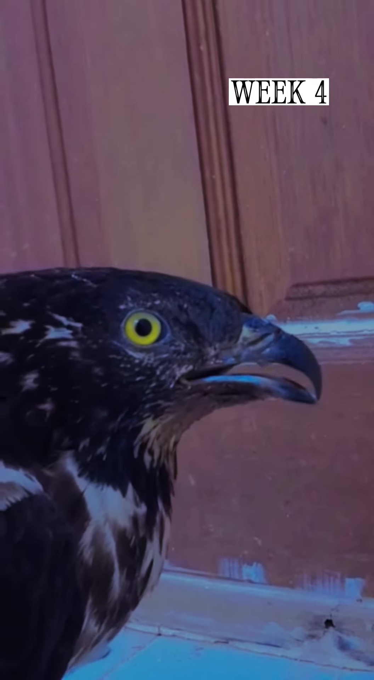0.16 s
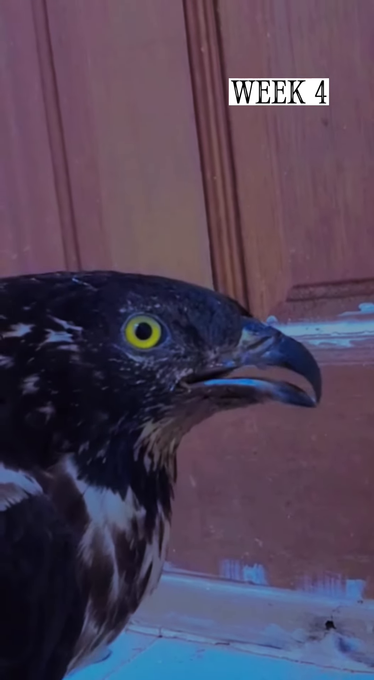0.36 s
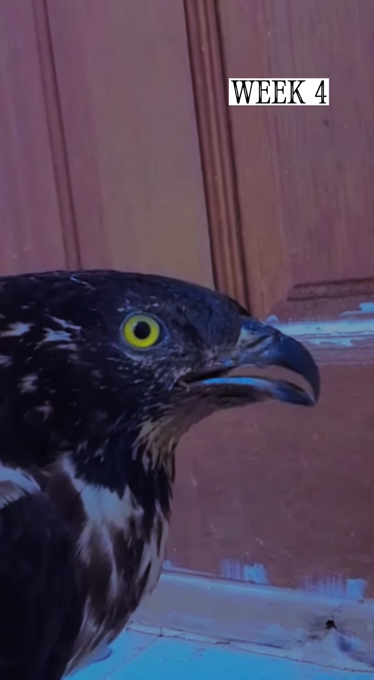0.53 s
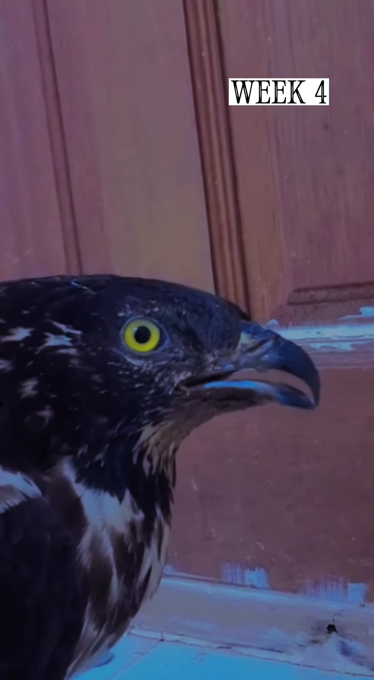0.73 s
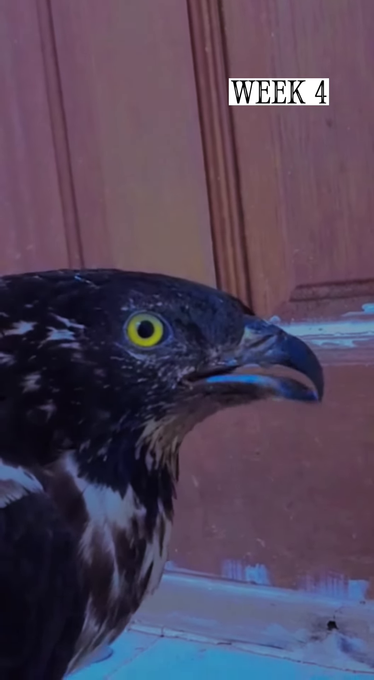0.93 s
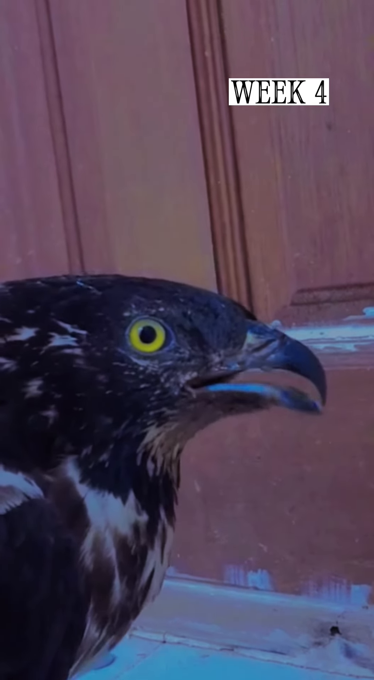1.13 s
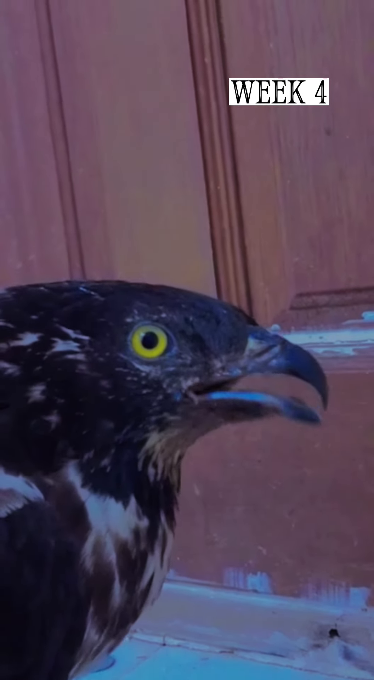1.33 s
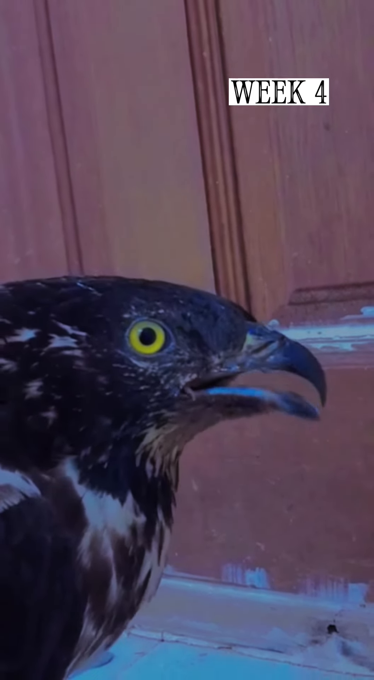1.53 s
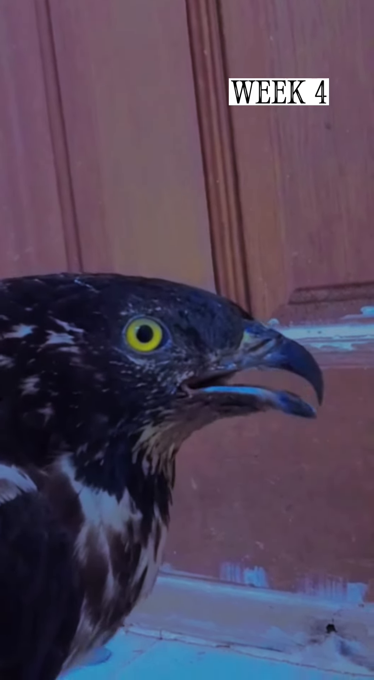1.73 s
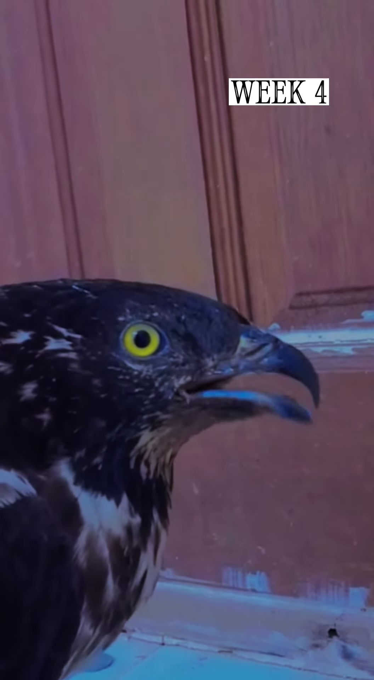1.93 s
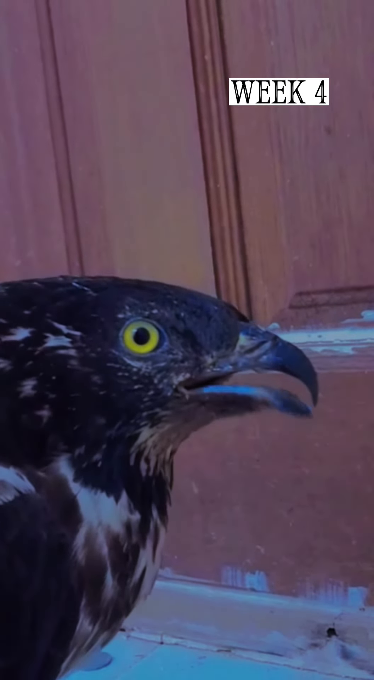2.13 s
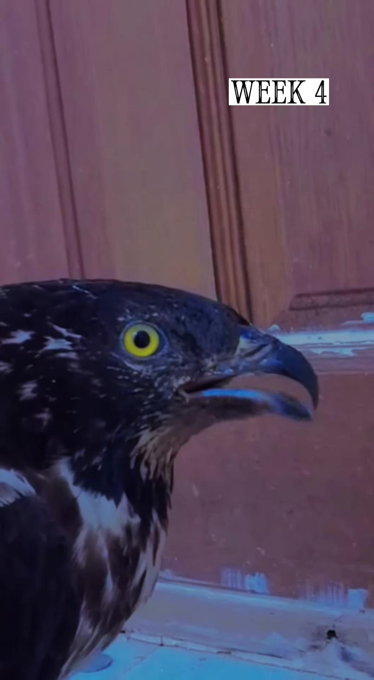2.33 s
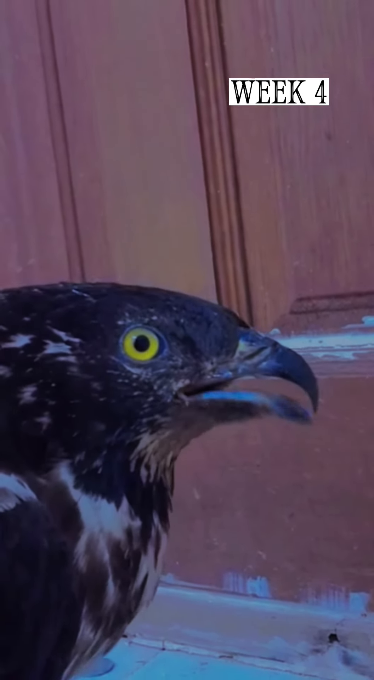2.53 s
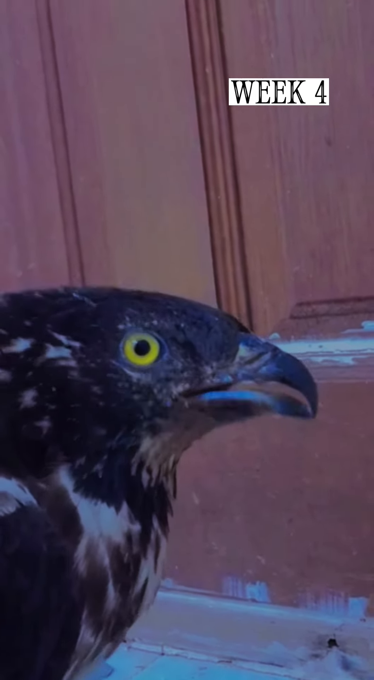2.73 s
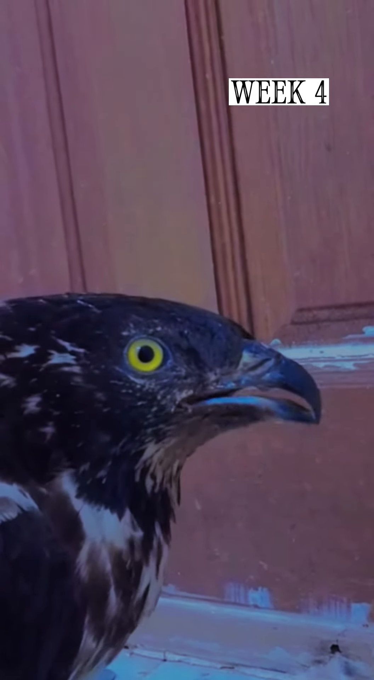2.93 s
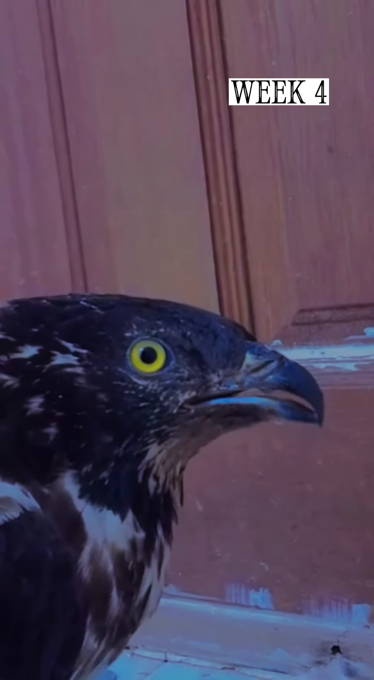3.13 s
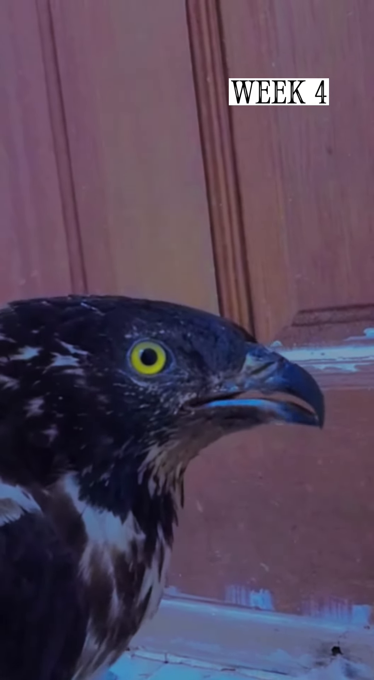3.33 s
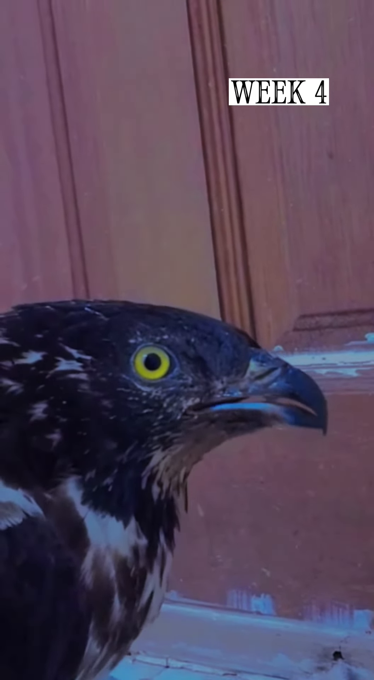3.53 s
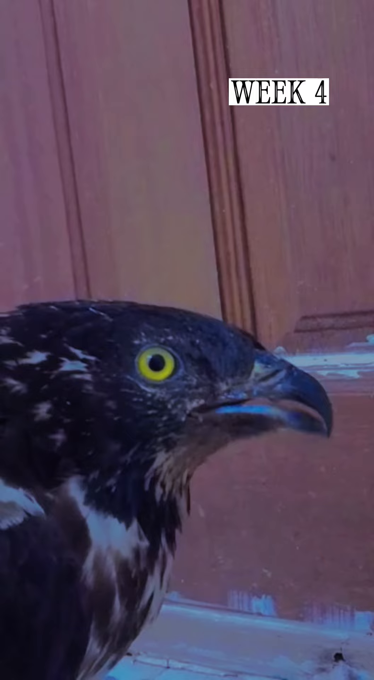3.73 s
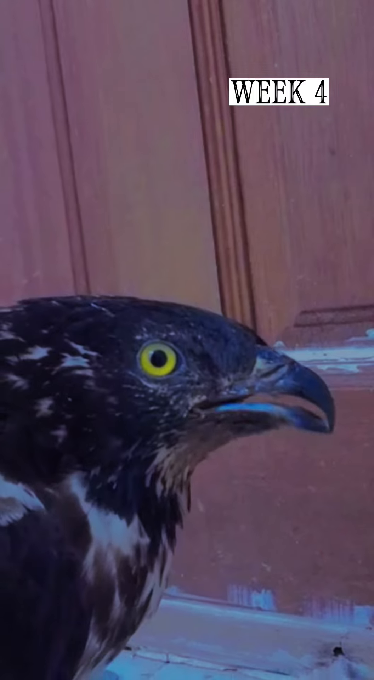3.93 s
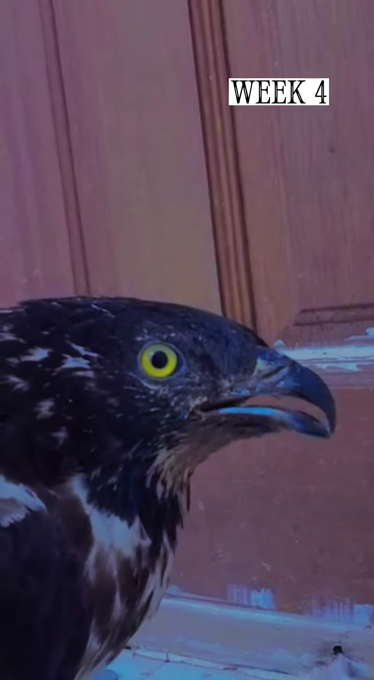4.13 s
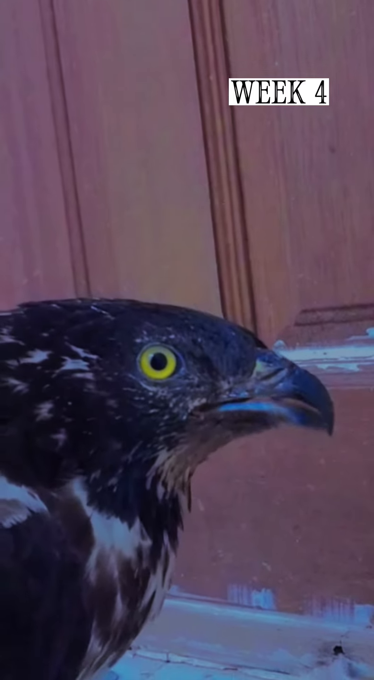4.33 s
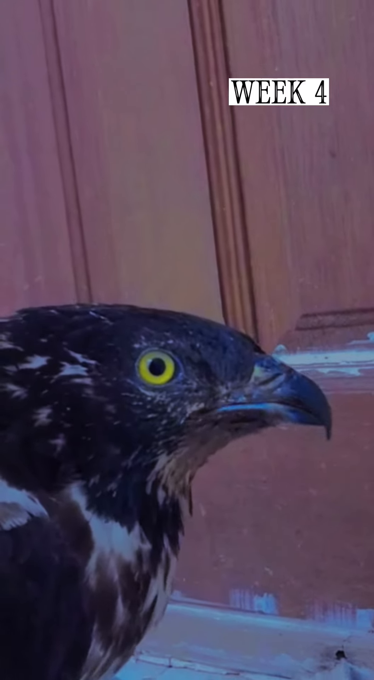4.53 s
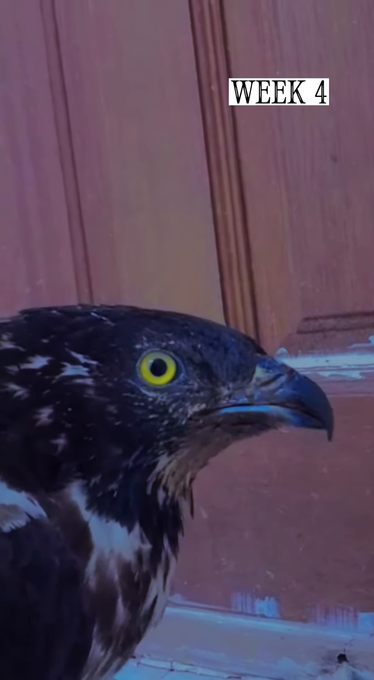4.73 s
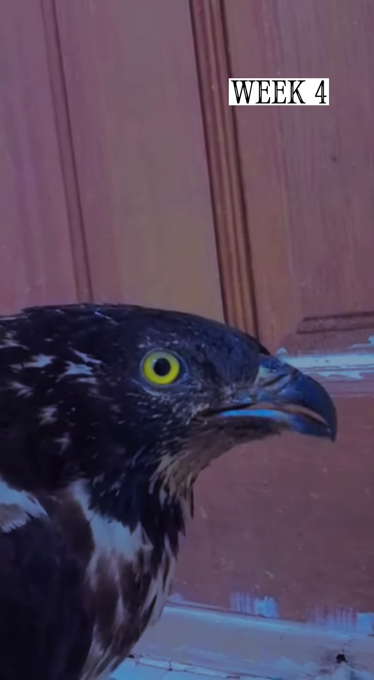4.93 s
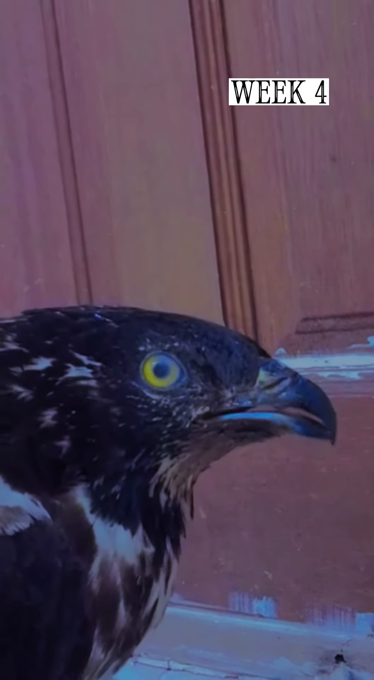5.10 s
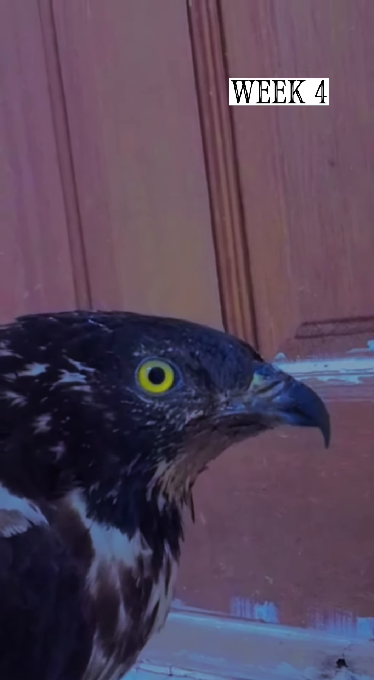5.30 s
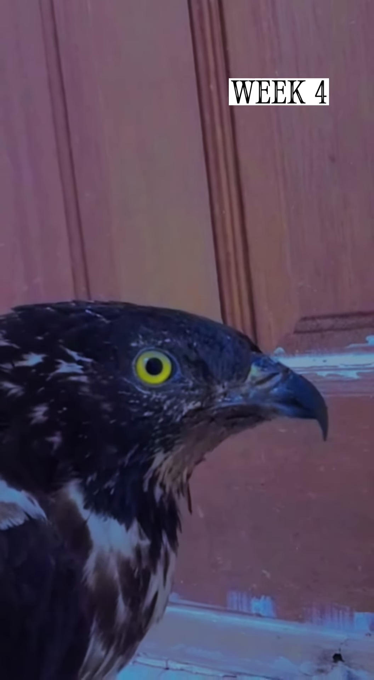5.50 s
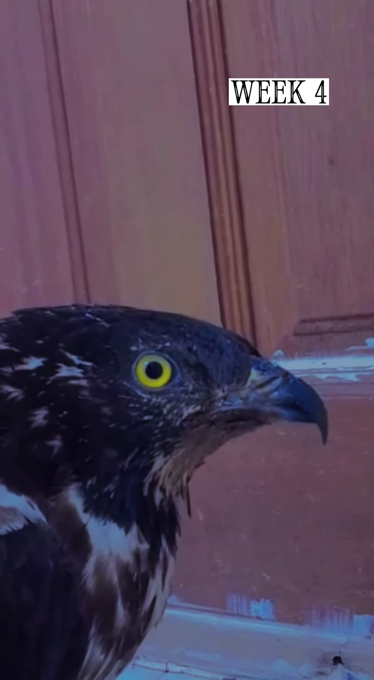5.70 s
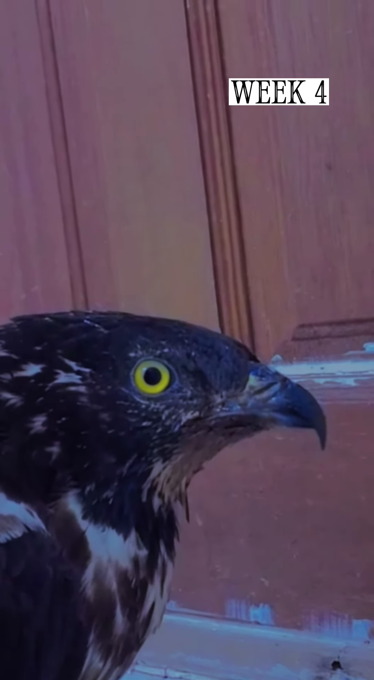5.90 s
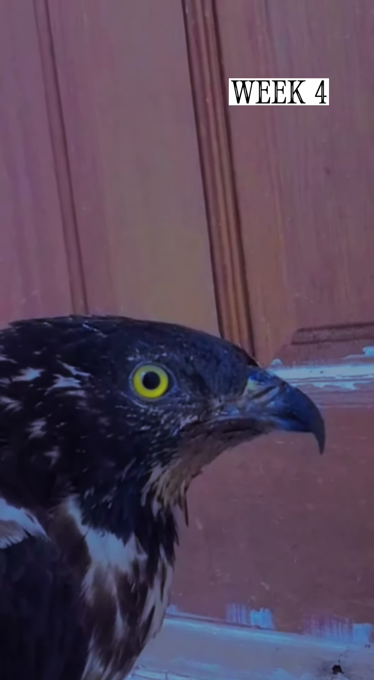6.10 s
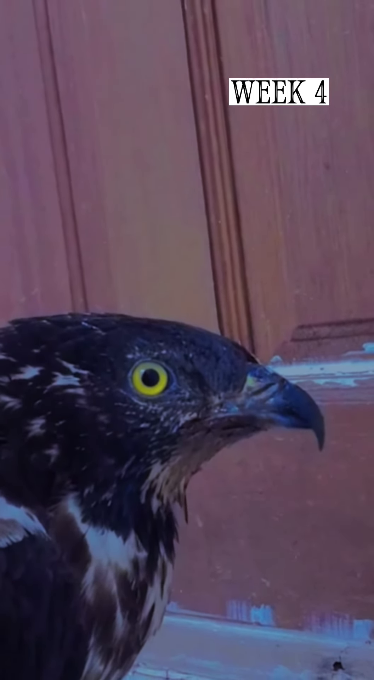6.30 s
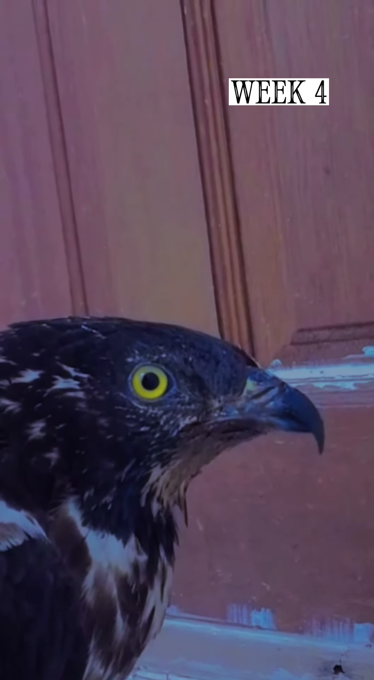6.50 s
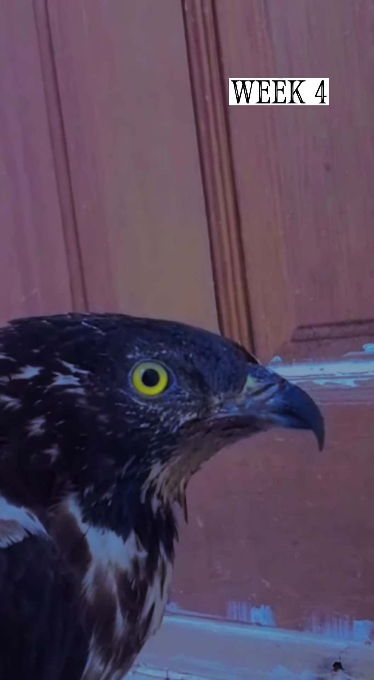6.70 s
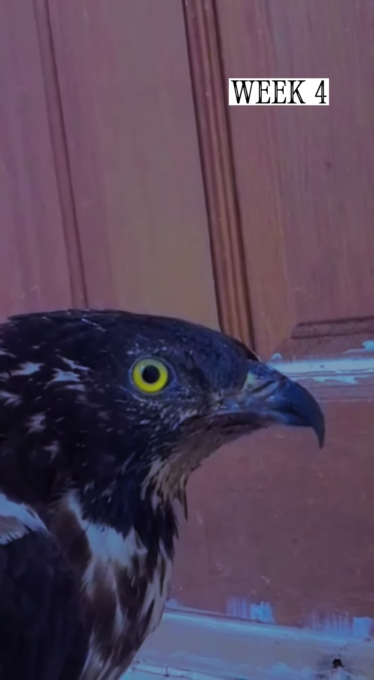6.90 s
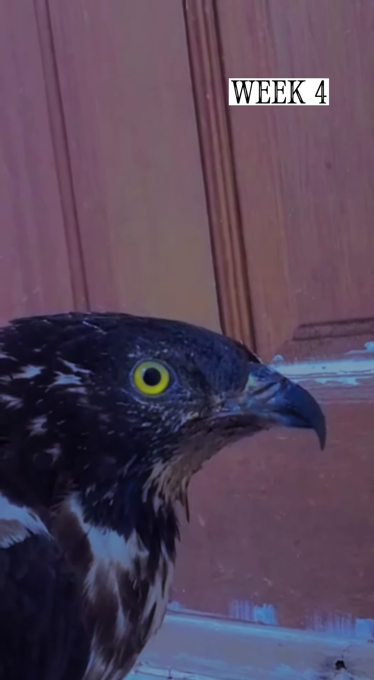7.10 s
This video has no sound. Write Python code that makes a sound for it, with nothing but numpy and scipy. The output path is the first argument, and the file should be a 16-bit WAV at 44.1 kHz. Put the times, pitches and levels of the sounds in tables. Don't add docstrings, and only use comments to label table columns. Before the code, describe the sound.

Already under way at the start, a shrill quavering raptor call pulses quickly, each loud hoarse peep led by a quieter whistle on the inhale. It is strongest early and midway, then lower and more tired, ending just after five seconds with a short wooden room ring. Underneath, wind buffets the right side of the close microphone with dull thuds, clicks and bassy rumble over faint hiss.

```python
import sys
import numpy as np
from scipy import signal
from scipy.fft import rfft, irfft, next_fast_len
from scipy.io import wavfile
from scipy.ndimage import uniform_filter1d

SR = 44100
rng = np.random.default_rng(int(sys.argv[2]) if len(sys.argv) > 2 else 0)


def ratio_of_db(decibels):
    return 10 ** (np.asarray(decibels, float) / 20)


def unload_wav(signal):
    wavfile.write(
        sys.argv[1],
        SR,
        np.round(np.clip(np.atleast_2d(signal).T, -1, 1) * 32767).astype(np.int16),
    )


N = 315315


def colour(x, hz, db, lag=0):
    size = next_fast_len(N + 4096)
    log_f = np.log(np.maximum(np.arange(size // 2 + 1) * SR / size, 1))
    gain = ratio_of_db(np.interp(log_f, np.log(hz), db))
    turn = np.exp(-1j * np.interp(log_f, np.log(hz), lag + 0 * hz))
    return irfft(rfft(x, size) * gain * turn, size)[..., :N]


def unit(x):
    return x / np.sqrt(np.mean(x ** 2))


def walk(count):
    knots = rng.standard_normal(int(count * N / SR) + 2)
    return 1.125 * np.interp(np.arange(N) * count / SR, np.arange(len(knots)), knots)


def add(track, s, sound):
    i = int(s * SR)
    track[i:i + len(sound)] += sound[:N - i]


# time in seconds, level in dB.
DRAUGHT = [(0, -37.5), (.5, -41), (1.0, -39.5), (1.6, -39), (1.91, -44), (2.2, -39), (3.1, -38.5),
           (3.7, -38), (4.4, -43), (4.68, -36), (5.04, -44.5), (5.32, -35.5), (5.71, -45), (6.3, -36.5),
           (6.85, -36), (7.15, -44)]
STIR_DB, STIR_S = 2.5, 0.07


def draught_db(t):
    stir = sum(np.exp(-np.abs(t - s - .02) / STIR_S) * ratio_of_db(db - 0.5) for s, db, *_ in PUSHES + PULLS)
    return np.interp(t, *np.transpose(DRAUGHT)) + STIR_DB * np.tanh(stir)


# frequency in Hz, density in dB per Hz.
RUMBLE = [(15, -71), (25, -23.5), (55, -3.5), (90, 0), (120, -9), (160, -13.5), (250, -27.5), (400, -37),
          (700, -55), (1200, -69.5), (2600, -110)]
# frequency in Hz, density in dB per Hz.
LEFT_RUMBLE = [(25, -35), (50, -9), (90, 0.5), (150, -11), (300, -23.5), (600, -40), (1200, -50),
               (3000, -69)]
# frequency in Hz, density in dB per Hz.
HISS = [(590, -36), (1000, -6.5), (2290, -11), (3340, -7.5), (5480, -11.5), (5940, -11.5), (6510, -9.5),
        (15600, -8.5)]
HISS_DB, LEFT_RUMBLE_DB, WHINE_DB, WHINE_HZ = -70.5, -42.5, -85.5, 6470


def air(t):
    gust_db = np.array([1.2 * walk(count=10), 4.6 * walk(count=25)])
    gusts = rng.standard_normal((2, N)) * ratio_of_db(gust_db)
    left = unit(colour(gusts[0], *np.transpose(LEFT_RUMBLE)))
    right = unit(colour(gusts[1], *np.transpose(RUMBLE)))
    rumble = np.array([left * ratio_of_db(LEFT_RUMBLE_DB), right * ratio_of_db(draught_db(t) + 10.0)])
    hiss = unit(colour(rng.standard_normal((2, N)), *np.transpose(HISS)))
    hiss = hiss * ratio_of_db(HISS_DB + np.array([[3.5], [2.5]]))
    whine_phase = 2 * np.pi * np.cumsum(WHINE_HZ * (1 + .006 * walk(count=40))) / SR
    whine = ratio_of_db(WHINE_DB + 5.2 * walk(count=20)) * np.sin(whine_phase)
    return rumble + hiss + whine


# time in seconds, strength in dB, rise in ms, hold in ms.
PUSHES = [(0.1257, 7.5, 0.23, 16), (0.654, 7, 0.31, 16.5), (.9524, 10, 0.48, 15.8),
          (2.5044, 10, 0.87, 15.5), (2.6032, 6.5, 0.52, 8.3), (2.637, 4, 0.23, 7.15),
          (2.6715, 0, 0.28, 1.7), (2.698, -1.5, 0.31, 15), (3.4748, 8.5, .5, 1.94), (3.607, 6, .3, 15.5),
          (3.648, 3.5, .3, 1.44), (4.033, -12, .6, .8), (4.224, 7.5, 0.36, 14.2), (4.4873, 6.5, 1.3, 16.5),
          (4.49, 9.5, 0.52, 0.54), (4.5867, 0.6, 0.45, 2.14), (4.6711, 1.5, 0.34, 7.5),
          (5.4009, -18, 1.08, 1.22), (5.9792, 8, 3.7, 13.2), (6.2228, -4.5, 1.05, 0.71),
          (6.4406, -18, 2.75, 15), (7.1042, -9, .2, .5), (7.106, 12, 0.79, 11.3)]
# time in seconds, strength in dB, rise in ms, hold in ms.
PULLS = [(0.414, 12.5, 1.75, 14.6), (0.5383, 3.9, 2.09, 7.2), (0.9093, 8.5, 1.37, 11.6),
         (2.0071, 2.5, 1.34, 15.2), (2.142, -7, 0.93, 12.4), (3.4456, -3, 0.86, 13.8),
         (3.5665, 10.5, 2.76, 2.14), (4.028, -5, 2.4, 3.5), (5.3368, 8, 1.8, 17.2), (5.921, 2, 2.14, 4.9),
         (6.225, 13.5, 2.12, 14.5)]
PULL_FALL_MS, HELD_FALL_MS, BRIEF_FALL_MS, FLAP_FALL_MS, TICK_FALL_MS = 3.5, 2.6, 1.2, .9, .75


def puff_rows():
    kind = np.digitize(np.transpose(PUSHES)[3], [1.05, 5, 11])
    falls = np.array([TICK_FALL_MS, BRIEF_FALL_MS, FLAP_FALL_MS, HELD_FALL_MS])[kind]
    pushes = [(*row, fall, 1) for row, fall in zip(PUSHES, falls)]
    return pushes + [(*row, PULL_FALL_MS, -1) for row in PULLS]


BASS_CUT_HZ, KNOCK_HZ, KNOCK_DB, CRACKLE_DB = 64, 167, -5, -33
LEAD_S = .025


def puffs():
    pressure, crackle = np.zeros(N), np.zeros(N)
    ms = np.arange(3000) / SR * 1000 - 25
    for s, db, rise, hold, fall, way in puff_rows():
        step = (np.tanh(ms / rise) - np.tanh((ms - hold) / fall)) / 2
        add(pressure, s - LEAD_S, ratio_of_db(db) * way * step)
        burst = np.exp(-(ms / 0.82) ** 2) + .12 * (ms > 0) * np.exp(-ms / 5)
        add(crackle, s - LEAD_S, ratio_of_db(db) / (.3 + rise ** 7) * burst)
    knock = signal.lfilter(*signal.iirpeak(KNOCK_HZ, 1.5, fs=SR), pressure)
    knock = ratio_of_db(KNOCK_DB) * np.gradient(knock) * SR / 1600
    crackle_hz = np.array([200, 600, 2400, 3100, 7000])
    crackle = colour(crackle * rng.standard_normal(N), crackle_hz, [7, -4.5, -12.5, -27.5, -65.0])
    bass_cut = signal.cheby1(6, 1, BASS_CUT_HZ, "high", fs=SR, output="sos")
    return signal.sosfilt(bass_cut, pressure + knock) + ratio_of_db(CRACKLE_DB + 21.5) * crackle


ROOM_T60_S, ROOM_TOP_T60_S, ROOM_DB, ROOM_TOP_DB = 0.64, 0.62, -6, -1


def room(x):
    t = np.arange(SR) / SR
    noise = rng.standard_normal((2, SR)) * np.clip((t - .004) / 0.0075, 0, 1)
    low = signal.sosfilt(signal.butter(2, 3800, fs=SR, output="sos"), noise)
    low_tail = low * ratio_of_db(-60 * t / ROOM_T60_S)
    top_tail = (noise - low) * ratio_of_db(ROOM_TOP_DB - 60 * t / ROOM_TOP_T60_S)
    tail = (low_tail + top_tail) * np.sqrt(14 / ROOM_T60_S / SR)
    return ratio_of_db(ROOM_DB) * signal.fftconvolve(x, tail, axes=1)[:, :N]


# start in seconds, length in seconds, middle pitch in Hz, end pitch in Hz, level in dB.
SQUEAKS = [
    (0.025, 0.0085, 6440, 7200, -40.5),
    (0.218, 0.0059, 6400, 7200, -41),
    (0.418, 0.014, 6260, 7200, -43),
    (0.627, .022, 5794, 4640, -29),
    (0.825, 0.022, 5408, 4440, -27),
    (0.646, .011, 5700, 5900, -48.5),
    (4.651, .033, 3643, 4300, -37),
    (4.896, 0.036, 3726, 4430, -33.5),
    (5.158, 0.026, 3430, 4100, -31.5),
]
HIGH_SCOOP, LOW_SCOOP = .86, .94


def squeaks():
    out, wobble = np.zeros(N), walk(count=500)
    for s, length, middle_hz, end_hz, db in SQUEAKS:
        high = middle_hz > 4500
        start_hz = middle_hz * (HIGH_SCOOP if high else LOW_SCOOP)
        u = np.linspace(0, 1, int(length * SR))
        hz = np.polyval(np.polyfit([0, .5, 1], [start_hz, middle_hz, end_hz], 2), u)
        shake = (.015 if high else .024) * wobble[:len(u)]
        phase = 2 * np.pi * np.cumsum(hz * (1 + shake)) / SR
        wobble = wobble[len(u):]
        level = ratio_of_db(db + 27.5 + 1.1 * wobble[:len(u)]) * np.sin(np.pi * u) ** 0.29
        tone = (1 if high else .4) * np.sin(phase) + 0.77 * (start_hz < 4000) * np.sin(2 * phase)
        add(out, s, level * tone)
    return out


# onset in seconds, hold in seconds, pitch in Hz, level in dB.
DRAWN = [(.199, .014, 1187, -30.5), (.406, .011, 1261, -23.5), (.604, .013, 1312, -21),
         (.804, .016, 1341, -20), (1.0, .023, 1382, -18.5), (1.188, .022, 1400, -16),
         (1.382, .026, 1400, -15.5), (1.583, .023, 1378, -16.5), (1.788, .023, 1389, -16.5),
         (1.995, .021, 1380, -16), (2.193, .034, 1375, -16.5), (2.401, .027, 1400, -17),
         (2.601, .031, 1365, -17), (2.819, .035, 1389, -18.5), (3.02, .035, 1372, -17),
         (3.225, .034, 1398, -16.5), (3.437, .042, 1357, -17), (3.664, .03, 1323, -20),
         (3.888, .038, 1289, -19.5), (4.117, .024, 1293, -20), (4.361, .027, 1241, -23),
         (4.625, .03, 1163, -31.5), (4.874, .016, 1218, -24.5), (5.128, .016, 1244, -22)]
# start in seconds, length in seconds, top pitch in Hz, peak in dB.
PUSHED = [(.048, 0.021, 1586, -8.5), (.251, 0.019, 1509, -9), (0.458, 0.018, 1551, -8.5),
          (.656, .027, 1550, -10), (0.854, 0.028, 1570, -9), (1.056, .029, 1550, -10),
          (1.248, 0.031, 1563, -8), (1.439, 0.028, 1563, -7.5), (1.644, 0.028, 1565, -7.5),
          (1.849, 0.026, 1524, -8), (2.053, 0.033, 1597, -8), (2.251, 0.034, 1524, -7),
          (2.464, 0.027, 1485, -8), (2.662, 0.033, 1505, -10), (2.882, 0.038, 1621, -8),
          (3.085, 0.035, 1551, -8.5), (3.284, .039, 1532, -8.5), (3.501, 0.036, 1490, -9),
          (3.728, 0.033, 1447, -8.5), (3.955, .031, 1446, -8), (4.193, 0.028, 1404, -7.5),
          (4.429, 0.03, 1400, -9), (4.687, .034, 1400, -9.5), (4.939, 0.035, 1400, -9.5),
          (5.192, .032, 1371, -10.5)]
# time in seconds, pushed note's end pitch in Hz,
# dip pitch in Hz, dip depth in dB, pushed note's swell in dB.
PHRASE = [(0, 1378, 1122, 15, 17), (.45, 1381, 1042, 13.5, 31.5), (1.251, 1396, 1041, 16.5, 10),
          (2.06, 1368, 1041, 14.5, 7.5), (2.249, 1373, 1181, 6, 10), (2.901, 1378, 1287, 3, 6),
          (3.101, 1340, 1340, 5.5, 5), (3.5, 1334, 1320, 4.5, 7), (3.73, 1338, 1234, 1.5, 9.5),
          (4.199, 1332, 1222, 1, 5), (4.428, 1306, 1182, 0, 5.5), (5.202, 1273, 1168, 13.5, 4.5)]


def breath_curves(t):
    rows = [(0, 1400, -120), (PUSHED[0][0] - .004, PUSHED[0][2], -50)]
    times, *phrase = np.transpose(PHRASE)
    for k, (s, length, top_hz, peak_db) in enumerate(PUSHED):
        end_hz, dip_hz, depth_db, swell_db = (np.interp(s, times, c) for c in phrase)
        start_db = peak_db - swell_db
        if k:
            on, hold, hz, db = DRAWN[k - 1]
            scoop = min(.965 + .012 * max(-16.5 - db, 0), 1.02)
            dip_db = db - depth_db - 1.1 * max(-33 - db + depth_db, 0)
            break_db = 5 + 45 * max(top_hz / end_hz - 1.08, 0) + 900 * max(.028 - length, 0)
            rows += [(on - .004, .97 * scoop * hz, -60),
                     (on + 0.00082, scoop * hz, db),
                     (on + 0.54 * hold, hz, db + 0.5),
                     (on + hold, .975 * hz, db - 4.0),
                     (min(on + hold + .014, s - .013), min(dip_hz, hz), dip_db),
                     (s - .011, .9 * top_hz, dip_db + 3),
                     (s - .007, .95 * top_hz, start_db - break_db)]
        end = s + length
        rows += [(s, top_hz, start_db),
                 (s + .25 * length, .25 * top_hz + .75 * 1.06 * end_hz, peak_db - 4.0),
                 (end - .012, 1.043 * end_hz, peak_db - 2.32),
                 (end - .003, end_hz, peak_db - 5.0),
                 (end + .003, .962 * end_hz, peak_db - 15.5),
                 (end + .009, .94 * end_hz, -48),
                 (end + 0.024, end_hz, -120)]
    s, hz, db = np.array(sorted(rows)).T
    pitch_hz = uniform_filter1d(np.interp(t, s, hz), size=130)
    return pitch_hz, uniform_filter1d(ratio_of_db(np.interp(t, s, db)), size=60)


# time in seconds, hoarseness in dB, half-pitch in dB, second partial in dB,
# head turned to the left in dB.
QUALITY = [
    (0, -17.5, -48.5, 6.5, -0.5),
    (.6, -6, -37, 8, 0.5),
    (1.101, -13.5, -38.5, 8, 0.5),
    (1.401, -16.5, -33.5, 6, 1),
    (2.1, -10.5, -52.5, 7, -1),
    (2.9, -9.5, -53, 7, 0),
    (3.4, -15.5, -32.5, 6.5, 0.5),
    (4.2, -14.5, -55.5, 6, 0),
    (5.3, -13, -46, 6, 0.5),
]


def voice(t):
    hz, level = breath_curves(t)
    s, *columns = np.transpose(QUALITY)
    hoarse_db, half_db, second_db, _ = (np.interp(t, s, c) for c in columns)
    push = np.clip(level / ratio_of_db(-10.0), 0, 1.5)
    shake = ratio_of_db(hoarse_db + 13.5) * (0.00053 + 0.0082 * push) * walk(count=600)
    phase = 2 * np.pi * np.cumsum(hz * (1 + shake)) / SR
    flutter = [ratio_of_db(4 * walk(count=120)) for _ in range(3)]
    first = np.sin(phase) * flutter[0] ** 0.28
    second = ratio_of_db(second_db) * push ** 0.7 / (1 + (hz / 1550) ** 40) * np.sin(2 * phase - .5)
    weights = {3: .9, 4: 1.6, 5: 1, 6: 1, 7: .6, 8: .6, 9: .6, 10: .6}
    upper = sum(np.sin(k * phase + k * k) * flutter[k % 3] * w for k, w in weights.items())
    halves = sum(np.sin((k + .5) * phase) * (1 + k) for k in range(6))
    halves = halves * ratio_of_db(half_db + 5.9 * walk(count=60)) * push
    rasp = ratio_of_db(hoarse_db + 13) * (.1 + push ** 1.3) * (1 + 0.82 * np.cos(phase)) * rng.standard_normal(N)
    rasp_hz = np.array([300, 1000, 2000, 3000, 3700, 6000, 16000])
    rasp = colour(level * rasp, rasp_hz, [-22, -10.0, -9.0, -2.5, 14.5, 10.0, 1.5])
    return level * (first + second + 1.637 * push ** 0.79 * upper + halves) + rasp


# frequency in Hz, left gain in dB, right gain in dB, right port's lag in rad.
THROAT = [(676, 0, 1, 1.5), (1400, 1.5, -4, 1.0), (2873, -2.5, -8, -0.3), (3106, -11, -6, -2.5),
          (3400, -27.5, -26.5, 4), (4310, -15.5, -17.5, 2.3), (4930, -23, -26, 0.3),
          (5600, -22, -28.5, 0.86), (7200, -16, -43, 7), (8253, -17.5, -50.5, 2), (9130, -38, -64, 3),
          (10300, -32, -53, 2), (12040, -34.5, -55.5, 12), (15200, -30, -50, -5.5)]


def throat(source):
    hz, left_db, right_db, lag = np.transpose(THROAT)
    return np.array([colour(source, hz, left_db), colour(source, hz, right_db, lag)])


def scene():
    t = np.arange(N) / SR
    bird = throat(voice(t) + squeaks())
    s, *_, turn_db = np.transpose(QUALITY)
    direct = bird * ratio_of_db(np.array([0 * t, -np.interp(t, s, turn_db)]))
    before = room(bird * (t < .1))[:, int(.2 * SR):]
    echoes = room(bird) + np.pad(before, ((0, 0), (0, N - before.shape[1])))
    return direct + echoes + air(t) + puffs() * np.array([[.012], [1]])


def top_cut(x):
    return signal.sosfilt(signal.butter(12, 15740, fs=SR, output="sos"), x)


def record(dry):
    fade = np.clip(np.arange(N)[::-1] / 300, 0, 1)
    return top_cut(np.clip(dry, -.98, .98) * fade)


dry = scene()
out = record(dry)
unload_wav(out)
```